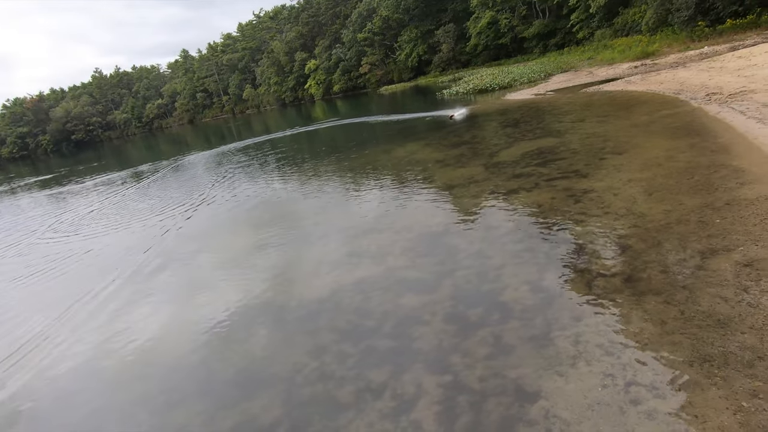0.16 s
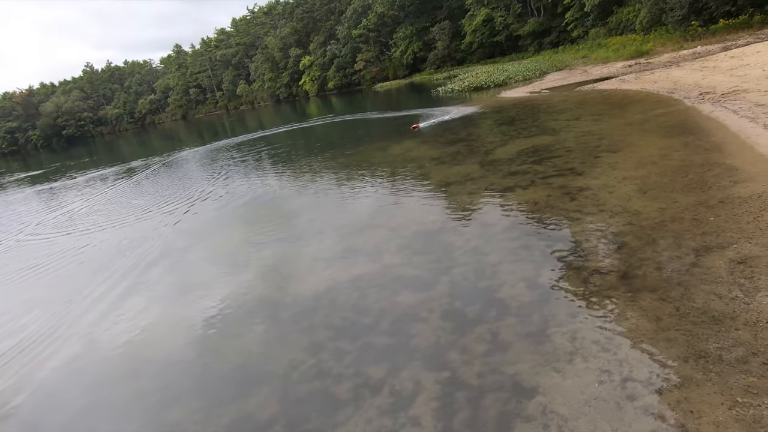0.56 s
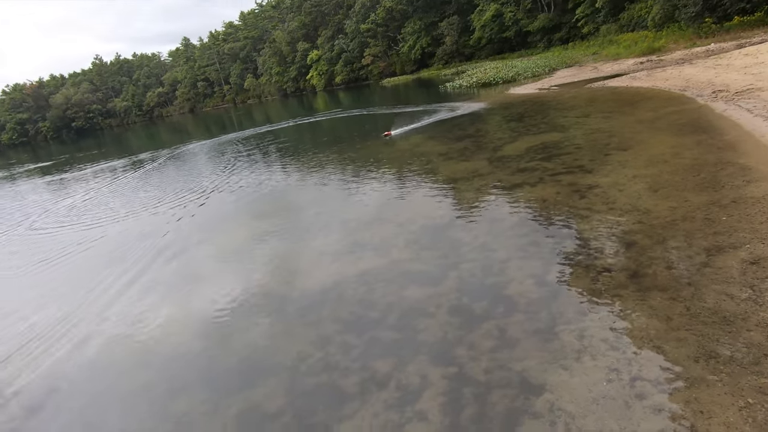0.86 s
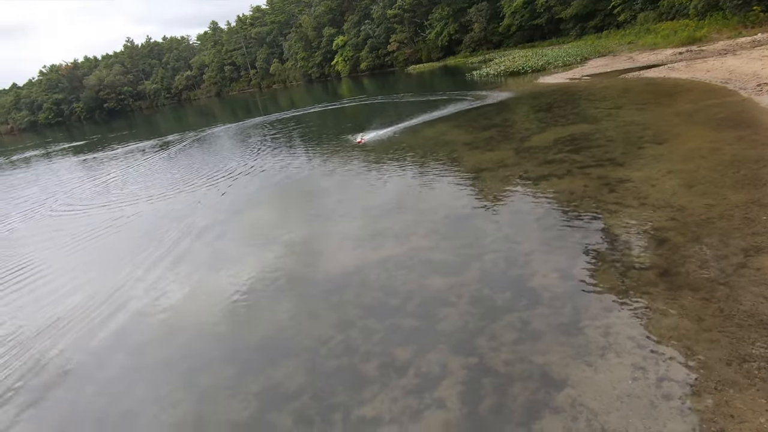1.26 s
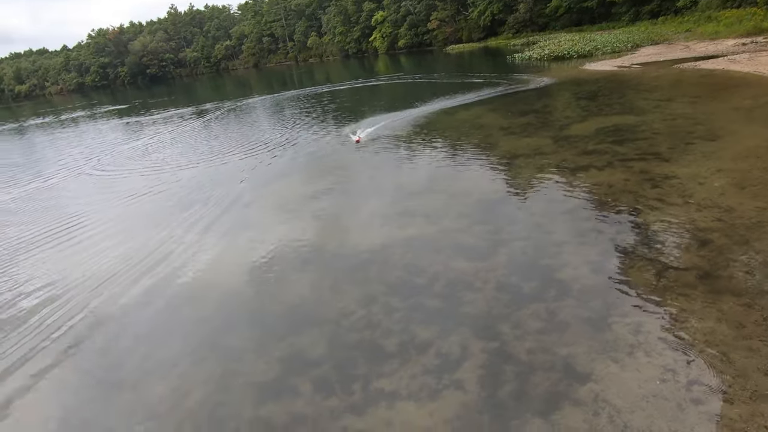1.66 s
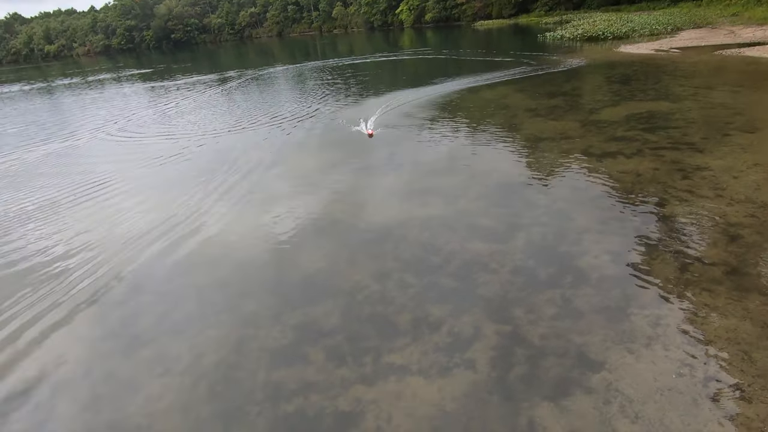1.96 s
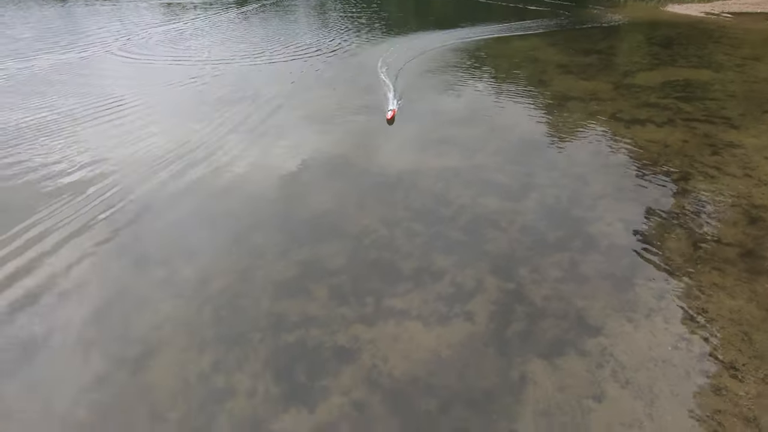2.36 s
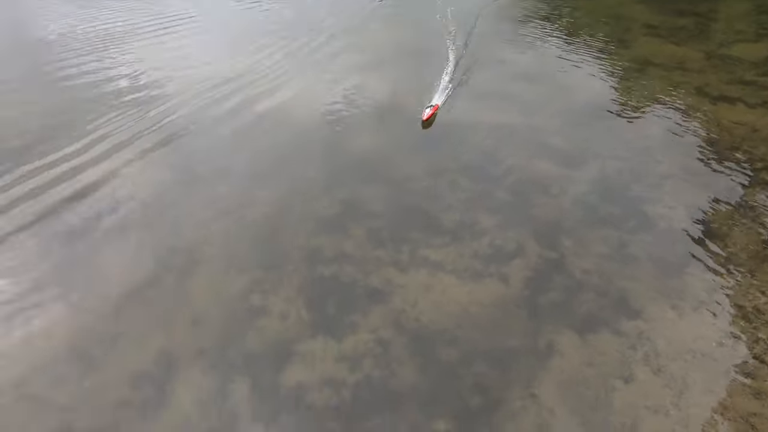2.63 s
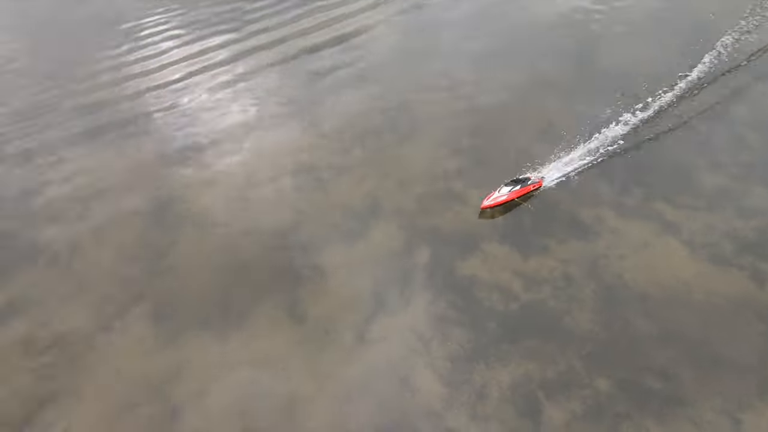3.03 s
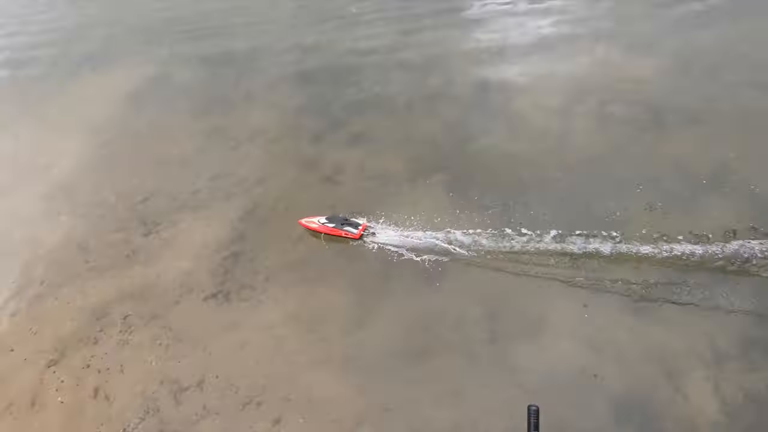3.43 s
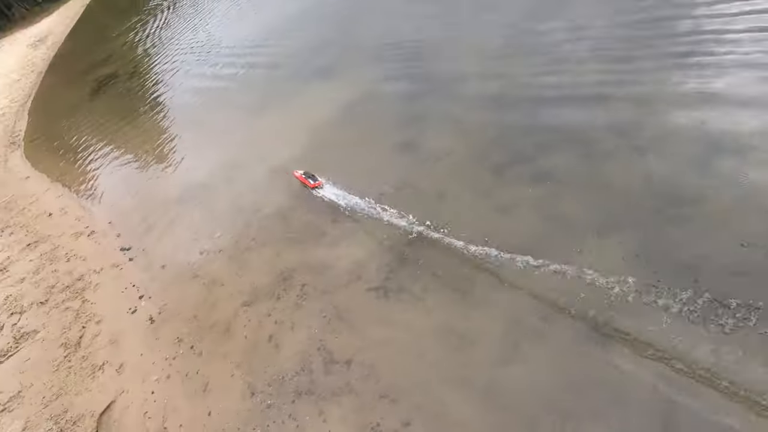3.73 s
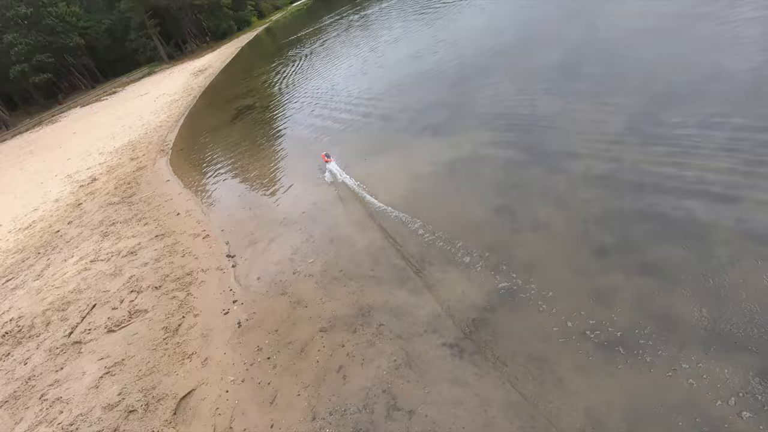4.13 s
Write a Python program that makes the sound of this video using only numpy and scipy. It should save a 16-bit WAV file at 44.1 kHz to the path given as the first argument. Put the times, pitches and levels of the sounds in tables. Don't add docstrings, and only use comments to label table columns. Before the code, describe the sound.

A toy boat's electric motor buzzes at a distance over thin water hiss, with two brief racing blips and splashes at the start. Its tone colour shifts as it turns and approaches; a faint rough rattle joins in, then the hiss and low hum swell in a close pass. The wake's fine hiss lingers as the boat recedes. Open lakeside air, with soft low wind thumps on a small stereo camera microphone.

```python
import sys
import numpy as np
from scipy import signal
from scipy.fft import rfft, irfft, next_fast_len
from scipy.io import wavfile
from scipy.ndimage import uniform_filter1d

SR = 44100
rng = np.random.default_rng(int(sys.argv[2]) if len(sys.argv) > 2 else 0)


def unload_audio(sound):
    columns = np.transpose(np.atleast_2d(sound))
    steps = np.round(np.clip(columns, -1, 1) * 32767)
    wavfile.write(sys.argv[1], SR, steps.astype(np.int16))


def elevation(decibels):
    levels = np.asarray(decibels, float)
    return 10 ** (levels / 20)


N = 189365
HOP, FRAME = 128, 512


def evened(x):
    return x / np.sqrt(np.mean(abs(x) ** 2) + 1e-20)


def read(points, hz, column=1):
    table = np.transpose(points)
    return np.interp(np.log(hz + 1), np.log(table[0] + 1), table[column])


def columns(rows, t):
    s, *values = np.transpose(rows)
    return [np.interp(t, s, v) for v in values]


def bumps(rows, t):
    return sum(height * np.exp(-((t - s) / half) ** 2) for s, half, height in rows)


def wander(rate_hz, count):
    steps = rng.standard_normal((count, N // HOP + 2))
    smoother = signal.butter(2, min(rate_hz * 2 * HOP / SR, .9))
    steps = signal.filtfilt(*smoother, steps)
    t = np.arange(N) / HOP
    return evened(np.array([np.interp(t, np.arange(len(row)), row) for row in steps]))


def coloured(x, points):
    size = next_fast_len(N)
    gain = elevation(read(points, np.fft.rfftfreq(size, 1 / SR)))
    return evened(irfft(rfft(x, size) * gain, size)[..., :N])


# peak t/s, peak level/dB, build-up t/s
WIND_PUFFS = [(0.0, -54, .05), (.24, -66, .05), (.32, -53, .04), (.42, -47.5, .04), (.57, -57, .08),
              (.84, -48.5, 0.13), (1.17, -58, .12), (1.41, -47.5, .11), (1.49, -67, .05), (1.66, -56, .06),
              (1.83, -50, .09), (1.92, -57, 0.032), (2.04, -54, 0.11), (2.16, -46, .06), (2.29, -61, .08),
              (2.51, -56, 0.07), (2.8, -59, .15), (2.97, -45, 0.023), (3.11, -43, .06), (3.19, -37, 0.081),
              (3.48, -44, 0.62), (3.62, -56, .4), (3.94, -51, .03), (4.12, -53, .03), (4.19, -55, .03)]
BUILD_DB, DROP_DB_PER_S, CALM_DB = 24, 337, -72


def gusts():
    t = np.arange(N) / SR
    strength = elevation(CALM_DB)
    for peak_s, db, build_s in WIND_PUFFS:
        fall_db = np.maximum(BUILD_DB * (peak_s - t) / build_s, DROP_DB_PER_S * (t - peak_s))
        strength = strength + elevation(db - fall_db)
    return strength


# f/Hz, level/dB per Hz
LAKESIDE_AIR = [(15, -26), (45, 2.5), (60, -6), (125, -2), (230, -1.5), (420, -10.5), (750, -2),
                (1100, -4.5), (1600, -48)]
AIR_DB = -54


def wind():
    rumble = [(15, -26), (30, -2.5), (45, 0.5), (70, 2.5), (110, -16.5), (200, -51)]  # f/Hz, level/dB per Hz
    puffs = coloured(rng.standard_normal((2, N)), rumble)
    puffs /= np.sqrt(uniform_filter1d(puffs ** 2, 3000) + 0.25)
    puffs = gusts() * puffs
    puffs = puffs + 0.18 * puffs[::-1]
    stir = coloured(rng.standard_normal((2, N)), LAKESIDE_AIR)
    return puffs * elevation([[2.5], [-2.5]]) + elevation(AIR_DB) * (stir + 0.5 * stir[::-1])


# t/s, nearness level/dB, hull turned to the shore level/dB, churn of the wake level/dB
BOAT_COURSE = [(0, -1.7, -10.1, -1), (.1, 0.7, -8.5, -0.3), (.25, -0.1, -3, -4), (.5, -1.2, 3.5, 0.9),
               (.6, -0.3, -2.1, 3), (.85, 0.3, 1.5, 4), (1.0, 0.3, -0.2, 7.5), (1.12, -0.6, -0.5, -0.3),
               (1.4, -0.3, 0.3, -1), (1.98, 0, 1.3, -1.6), (2.15, 3, -.6, -0.7), (2.48, 8, 1.3, -2.2),
               (2.85, 11.5, 2.7, 0.5), (3.1, 15, 3.5, -1), (3.42, 16.5, 1.4, 0.4), (3.64, 14.5, 2.3, 2),
               (3.87, 10, 1.3, 0.9), (4.29, 6, -1.5, 0)]
# t/s, half length t/s, level/dB
SPLASHES = [
    (.17, .05, 5.),
    (.26, 0.043, -1.5),
    (.37, 0.02, 2.5),
    (.44, .03, -1),
]
# far-off level/dB, then shares of nearness, churn and skip splash [0-1 or so]
WASH_MIX = (-41, 0.8345, 0.5955, 0.9)
SPRAY_MIX = (-50.5, 1.0736, 0.99, 1.14)
MIST_MIX = (-69, 1.276, 0.1, 0.9)
WAKE_S, WAKE_DB_PER_S = 3.5, 16


def wetness():
    t = np.arange(N) / SR
    near_db, _, churn_db = columns(BOAT_COURSE, t)
    skip_db = bumps(SPLASHES, t)
    wash_db, spray_db, mist_db = [far_db + near * near_db + churn * churn_db + skip * skip_db
                                  for far_db, near, churn, skip in (WASH_MIX, SPRAY_MIX, MIST_MIX)]
    return wash_db, spray_db, mist_db + WAKE_DB_PER_S * np.maximum(t - WAKE_S, 0)


# f/Hz, level/dB per Hz
WASH_COLOUR = [(200, -32.5), (450, -18), (750, -20), (1050, -8), (1500, -11.5), (1900, -6.5), (2200, -4),
               (2500, -4.5), (2850, -1), (3600, -3), (4100, -7.5), (5000, -18), (6000, -59)]
# f/Hz, level/dB per Hz
SPRAY_COLOUR = [(3500, -47), (4500, -0.5), (5300, -2.5), (6300, 2), (7000, -2), (7600, -6.5), (8300, -15.5),
                (9000, -74)]
# f/Hz, level/dB per Hz
MIST_COLOUR = [(7500, -25), (8500, -3), (9300, -3.5), (10300, -8), (11000, -18), (11700, -24), (12400, -21),
               (14500, -23.5), (15150, -26), (15500, -60)]
# t/s, share [0-1]
CAMERA_TILT = [(0, 0), (2.4, 0), (2.85, 0.4), (3.1, 0.77), (3.4, 0.8), (3.7, 0.66), (3.95, 0.63),
               (4.29, 0.4)]


def water(angle):
    wash_db, spray_db, mist_db = wetness()
    chop = 1 + 0.076 * np.cos(angle) + 0.056 * np.cos(2 * angle + 0.59)
    droplet_db = 2.13 * np.minimum(rng.exponential(1, (2, 1, N)), 5)
    drops = rng.standard_normal((2, 2, N)) * elevation(droplet_db)
    splash_db = 0.8 * wander(60, count=2)
    wash = elevation(wash_db + splash_db[0]) * coloured(drops[0] * chop, WASH_COLOUR)
    fine = drops[1] * chop ** 2.6 * elevation(0.28 * splash_db[0] + 1.4 * splash_db[1])
    spray = elevation(spray_db) * coloured(fine, SPRAY_COLOUR)
    mist = elevation(mist_db) * coloured(fine, MIST_COLOUR)
    hz, t, z = signal.stft(wash + spray + mist, SR, nperseg=FRAME, noverlap=FRAME - HOP)
    patches = uniform_filter1d(rng.standard_normal(z.shape[1:]), 4, 0)
    patches = evened(uniform_filter1d(patches, 11, 1))
    tilt = np.clip(columns(CAMERA_TILT, t)[0], 0, 1)
    close_db = 2.0 * tilt ** 1.1 * np.exp(-((hz[:, None] - 1250) / 400) ** 2)
    return z * elevation(2.4 * patches + close_db)


# shaft order, level/dB
HALF_ORDERS = [(2.5, -55.5), (3.5, -53), (7.5, -45.5)]
HALVES_S, HALVES_HALF_S = 2.8, 0.52
HALVES_SWAY, HALVES_SWAY_HZ = 2.4, 12


def coupling(angle):
    orders, db = np.transpose(HALF_ORDERS)[:, :, None]
    count = len(HALF_ORDERS)
    sway = HALVES_SWAY * wander(HALVES_SWAY_HZ, count=count)
    levels = elevation(db + 2.9 * wander(13.0, count=count))
    lines = levels * np.cos(np.round(2 * orders) / 2 * angle + sway)
    heard = bumps([(HALVES_S, HALVES_HALF_S, 1)], np.arange(N) / SR)
    return np.sqrt(2) * lines.sum(0) * heard


# t/s, turns f/Hz
SHAFT_SPEED = [(0.0, 304.2), (0.1, 301.8), (0.28, 292.3), (0.5, 291.0), (0.6, 294.9), (0.88, 296.6),
               (1.2, 294.3), (1.55, 295.0), (2.0, 294.8), (2.28, 297.2), (2.56, 299.2), (2.8, 297.7),
               (3.12, 297.9), (3.4, 293.9), (3.68, 292.8), (3.96, 291.6), (4.29, 292.3)]
# t/s, half length t/s, added f/Hz
RACING = [
    (.183, .046, 20.),
    (.372, .043, 10.3),
]


def shaft():
    t = np.arange(N) / SR
    hz = columns(SHAFT_SPEED, t)[0] + bumps(RACING, t)
    skipping = uniform_filter1d(abs(np.gradient(hz)) * SR, 4000) / 100
    tremble = .0014 * (1 + 1.2 * skipping) * wander(25, count=1)[0]
    return 2 * np.pi * np.cumsum(hz * (1 + tremble)) / SR


# t/s, shaft order, half length t/s, level/dB
PANEL_FLARES = [(0.16, 6, 0.021, 8.5), (0.523, 9, 0.038, 10.5), (1.5, 9, 0.054, 7.5), (1.585, 12, 0.062, 8),
                (1.7, 12, .04, -3), (1.81, 12, 0.059, 8), (1.925, 10, 0.11, 5.5), (1.47, 10, 0.11, -9),
                (1.13, 12, .05, -15), (1.9, 12, .04, -9), (2, 13, 0.031, -18), (1.59, 7, 0.032, -5),
                (1.7, 8, 0.056, -4), (1.9, 11, 0.13, -4), (1.1, 9, 0.077, 10.5), (3.1, 8, 0.14, 4),
                (2.59, 3, 0.061, -2), (3.27, 7, 0.049, 3), (1.938, 3, 0.037, -4.5), (2.25, 11, .06, 5),
                (2.3, 10, 0.047, -5), (4, 3, 0.11, -2.5), (3.3, 9, 0.04, 0.5), (1.34, 1, 0.23, -4),
                (1.11, 2, 0.15, -6.5), (1.98, 2, .35, 4.5), (3.11, 2, 0.18, 5.5), (0.14, 2, 0.4, -6),
                (1, 2, .1, 4), (3, 13, 0.19, 3.5)]


def flares(order, t):
    return bumps([(s, half, db) for s, k, half, db in PANEL_FLARES if round(k) == order], t) + 0 * t


HULL_ORDERS = [-2, -5, -13.5, -2.5, -6, -7, -5, 0.1, -5.5, -2.5, -2.5, -14, -12.5, -19]
TOP_ORDERS = [-18.5, -17.5, -16.5, -18.5, -15, -25.5, -13.5, -22]
# t/s, time taken t/s
HULL_TURNS = [(.22, 0.033), (.41, 0.028), (.57, 0.034), (1.11, 0.0056), (1.39, .04), (2.161, 0.16),
              (2.748, 0.18), (3.19, 0.096), (3.5, 0.13), (3.8, 0.13)]
# shaft order, first side, last side, level/dB
HULL_PANELS = [(3, 1, 1, 2.5), (3, 3, 3, -8), (3, 4, 5, 6), (3, 6, 6, -11), (3, 7, 7, -16), (4, 3, 3, 2),
               (4, 10, 10, 4.5), (5, 8, 8, 15.5), (5, 9, 9, 10), (6, 4, 5, -7), (6, 9, 9, -13),
               (6, 10, 10, -5.5), (7, 2, 2, 3), (7, 4, 4, 7.5), (7, 6, 7, 9), (7, 9, 10, 9), (8, 1, 3, 4),
               (8, 7, 9, 7), (9, 3, 4, -5.5), (9, 8, 8, 8.5), (18, 1, 2, 4), (10, 1, 2, -8),
               (10, 7, 10, -3.5), (11, 1, 2, 5), (12, 7, 10, -1), (12, 10, 10, -16), (13, 8, 10, -11),
               (16, 3, 5, 6.5), (10, 4, 4, 3), (15, 8, 10, -9)]
STERN_ORDER, STERN_LOW_DB, STERN_HIGH_DB = 7.5, -3, -7


def hull(orders, t):
    view = sum(np.clip((t - s) / taken + .5, 0, 1) for s, taken in HULL_TURNS)
    pattern_db = np.array([*HULL_ORDERS, *TOP_ORDERS])[:, None] + np.zeros(len(t))
    for order, first, last, db in HULL_PANELS:
        shown = np.clip(view - round(first) + 1, 0, 1) - np.clip(view - round(last), 0, 1)
        pattern_db = pattern_db + db * (orders == round(order)) * shown
    astern = np.clip(1 - view, 0, 1)
    stern_db = np.where(orders < STERN_ORDER, STERN_LOW_DB, pattern_db + STERN_HIGH_DB)
    return (1 - astern) * pattern_db + astern * stern_db


# far-off level/dB, share of nearness
FIRST_MIX = (-55, 1.05)
SECOND_MIX = (-50, 0.78)
HIGHER_MIX = (-36.5, 0.52)
UNLOAD_DB_PER_HZ = -0.12
SHAKE_PER_DB, SHAKE_HZ = .0022, 30


def whine(angle):
    t = np.arange(N) / SR
    near_db, facing_db, _ = columns(BOAT_COURSE, t)
    first_db = FIRST_MIX[0] + FIRST_MIX[1] * near_db + flares(order=1, t=t)
    second_db = SECOND_MIX[0] + SECOND_MIX[1] * near_db + flares(order=2, t=t)
    second_db = second_db + UNLOAD_DB_PER_HZ * bumps(RACING, t)
    rest_db = HIGHER_MIX[0] + HIGHER_MIX[1] * near_db + facing_db

    count = len(HULL_ORDERS) + len(TOP_ORDERS)
    orders = np.arange(count)[:, None] + 3
    pattern_db = hull(orders, t)
    flutter_db = 1.8 * wander(4, count=count) + .9 * wander(25, count=count)
    flutter_db = flutter_db * np.minimum(orders / 9, 1)
    flutter_db += [flares(order, t) for order in orders[:, 0]]
    pattern_rms = np.sqrt((elevation(pattern_db) ** 2).sum(0))
    levels = elevation(pattern_db + flutter_db + rest_db) / pattern_rms

    spread = 2.3 * rng.uniform(-1, 1, orders.shape)
    start = spread + 0.27 * wander(5.6, count=count)
    start = start + SHAKE_PER_DB * orders * np.maximum(near_db, 0) * wander(SHAKE_HZ, count=count)
    rest = (levels * np.cos(orders * angle + start)).sum(0)
    low = elevation(first_db) * np.cos(angle) + elevation(second_db) * np.cos(2 * angle + 2.2)
    return np.sqrt(2) * (rest + low * elevation(0.84 * wander(21, count=1)[0]))


# f/Hz, level/dB against the shared
LOOSE_WATER = [(300, -7), (1000, -10), (1450, -6), (2000, -22), (3200, -35), (4800, -31), (5800, -14),
               (7200, -7.5), (8200, 1), (9500, -6), (10600, -9), (12000, -10), (13000, -11), (15000, 4)]
# f/Hz, share in step, share a quarter cycle ahead
FAR_SIDES = [(300, -0.06, -0.048), (600, -0.037, 0.2), (890, -0.26, -0.22), (1260, -0.22, 0.51),
             (1460, 1, -0.09), (1620, -0.12, -0.65), (2360, -0.08, 0.14), (2750, -0.31, -0.36),
             (3250, -0.044, -0.02), (4300, -0.21, 0.12), (5800, 0.23, -0.27), (6360, -0.017, -0.51),
             (6900, -0.31, 0), (7700, 0.76, -.1), (8400, -0.19, -.45), (8900, 0.094, -.6),
             (9700, -1.1, -0.72), (11300, -1, 0), (11800, -0.38, 0), (14000, -0.48, 0)]
# f/Hz, share in step, share a quarter cycle ahead
NEAR_SIDES = [(300, 0.071, -0.085), (600, -0.44, -0.084), (940, 0.52, 0), (1560, -0.39, 0.22),
              (2080, 0.006, -0.28), (2600, -0.66, -0.0039), (3100, 0.14, 0.93), (4500, -0.44, 0),
              (5650, -0.064, 0.56), (6400, 0.18, -0.081), (6900, 0.94, -.05), (7600, 0.78, -.3),
              (8350, -0.27, .1), (8900, -1.9, 0.22), (11500, -1., 0), (13100, 0, -1.5), (14000, -0.7, 0)]


def ports(tone, wet):
    hz, t, z = signal.stft(tone, SR, nperseg=FRAME, noverlap=FRAME - HOP)
    tilt = np.clip(columns(CAMERA_TILT, t)[0], 0, 1)
    slid = hz[:, None] / (1 + 0.41 * tilt * np.exp(-(hz[:, None] / 4500) ** 2))
    far = read(FAR_SIDES, slid) + 1j * read(FAR_SIDES, slid, column=2)
    near = read(NEAR_SIDES, hz) + 1j * read(NEAR_SIDES, hz, column=2)
    cancel_db = -8. * tilt ** 2 * np.exp(-((hz[:, None] - 8400) / 500) ** 2)
    both = (z + wet[0]) * elevation(cancel_db)
    sides = (1 - tilt ** 3) * far + tilt ** 3 * near[:, None]
    apart = both * sides + wet[1] * elevation(read(LOOSE_WATER, slid))
    pair = np.array([both + apart, both - apart])
    return signal.istft(pair, SR, nperseg=FRAME, noverlap=FRAME - HOP)[1][:, :N]


def scene():
    angle = shaft()
    motor, wet, air = whine(angle), water(angle), wind()
    return ports(motor + coupling(angle), wet) + air


def low_pass(x):
    return signal.sosfilt(signal.butter(12, 15540, fs=SR, output="sos"), x)


def record(dry):
    return low_pass(dry)


dry = scene()
out = record(dry)
unload_audio(out)
```